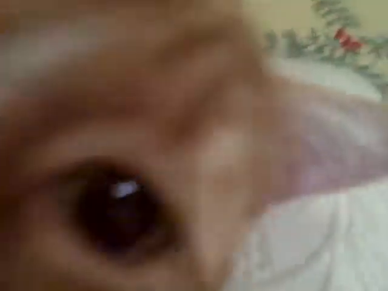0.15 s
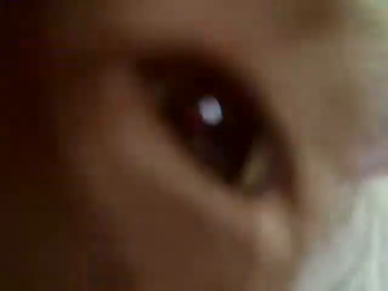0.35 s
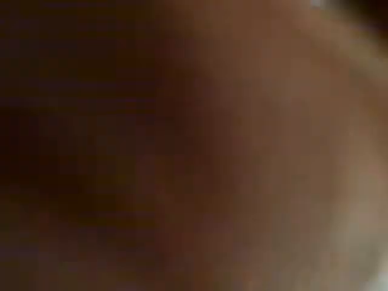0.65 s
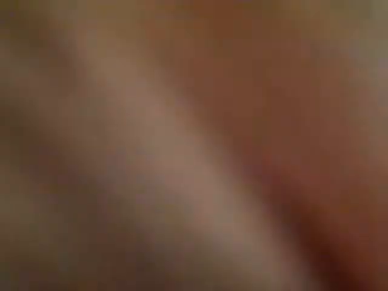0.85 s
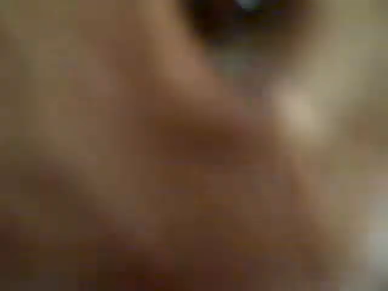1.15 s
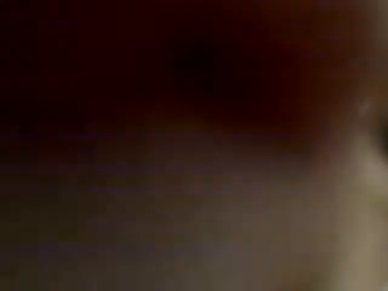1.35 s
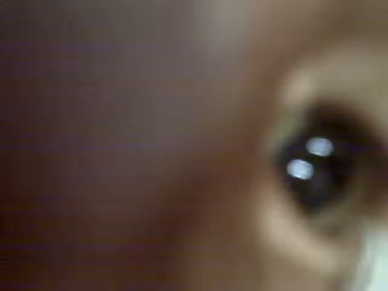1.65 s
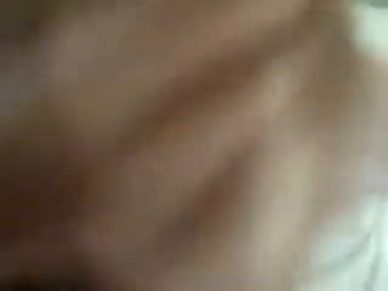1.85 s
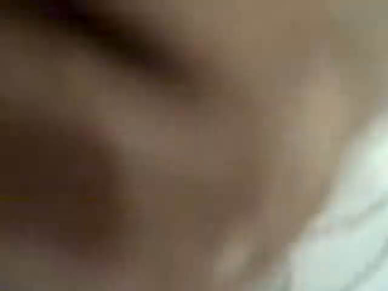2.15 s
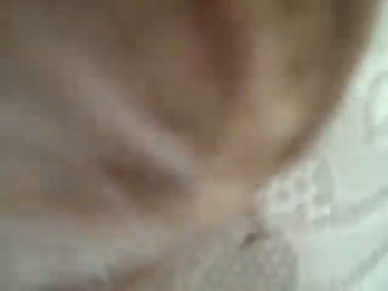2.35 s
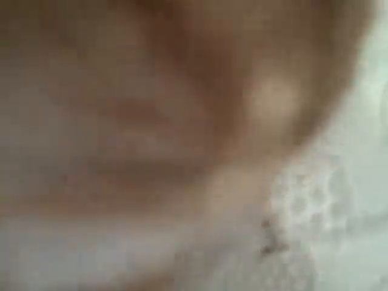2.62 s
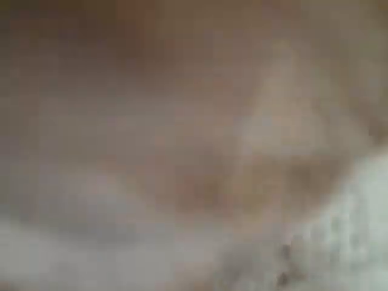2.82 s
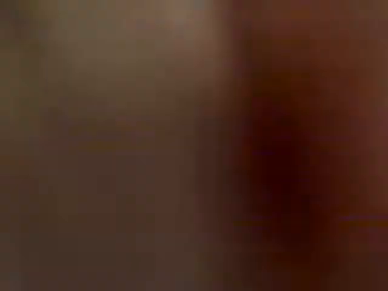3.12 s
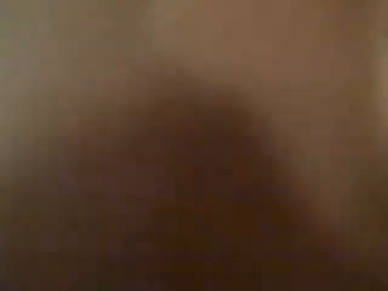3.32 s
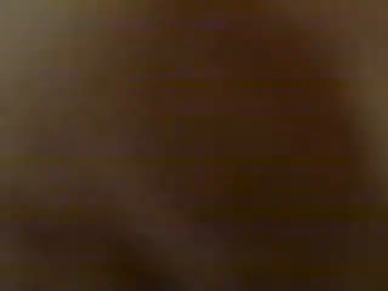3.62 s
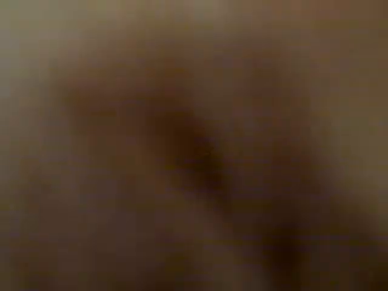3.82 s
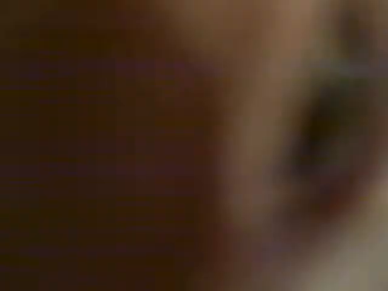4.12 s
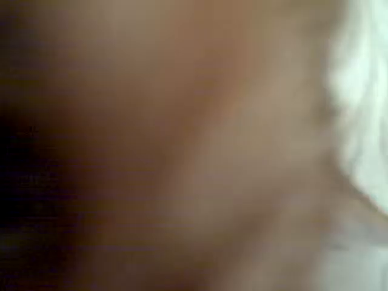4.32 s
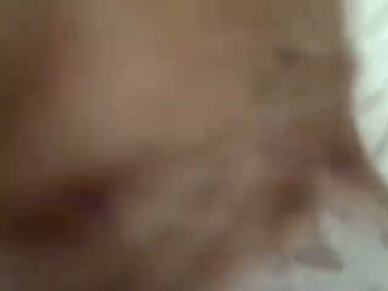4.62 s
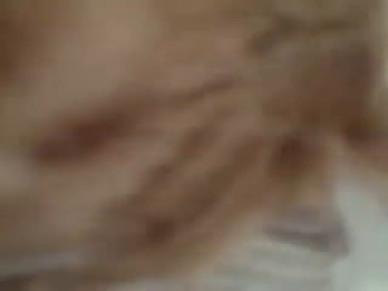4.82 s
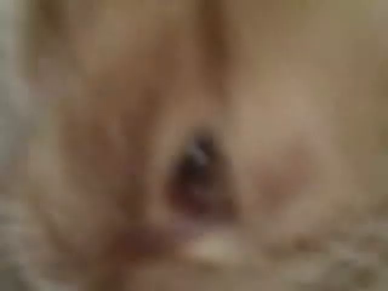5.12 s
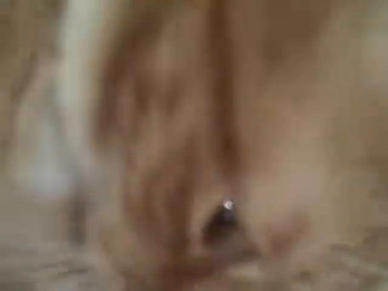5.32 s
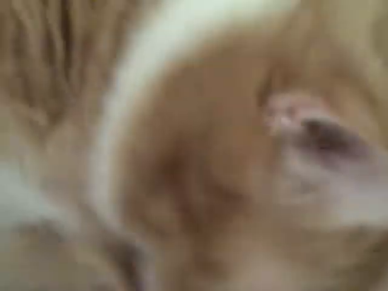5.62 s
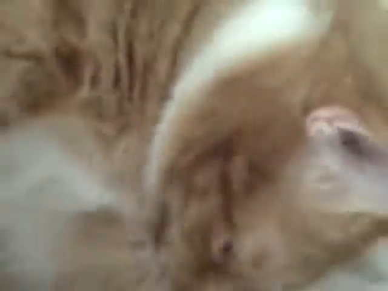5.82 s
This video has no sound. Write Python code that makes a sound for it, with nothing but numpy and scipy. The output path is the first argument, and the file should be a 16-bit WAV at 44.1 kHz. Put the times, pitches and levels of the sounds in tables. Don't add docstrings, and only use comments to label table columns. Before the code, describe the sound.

Extremely close, low-quality microphone indoors: quick nasal sniffs chopped by a rough purr of about 28 pulses a second, low wind bumps and bright clicks. The loudest blast comes in the second second, a second long exhale follows past three seconds, then a dull gust. The end is quieter, with faint nose rattles, breathy hiss, and fur and whiskers ticking and brushing on the case over low hum.

```python
import sys
import numpy as np
from scipy import signal
from scipy.fft import rfft, irfft, next_fast_len
from scipy.io import wavfile
from scipy.ndimage import uniform_filter1d, map_coordinates

SR = 44100
rng = np.random.default_rng(int(sys.argv[2]) if len(sys.argv) > 2 else 0)


def generate_wav(signal):
    frames = np.transpose(np.atleast_2d(signal))
    scaled = np.clip(frames, -1, 1) * 32767
    pcm = np.round(scaled).astype(np.int16)
    wavfile.write(sys.argv[1], SR, pcm)


def elevation(decibels):
    levels = np.asarray(decibels, float)
    return 10 ** (levels / 20)


N = 262836
T = np.arange(N) / SR


def unit(x):
    return x / np.sqrt(np.mean(x ** 2) + 1e-20)


def wobble(rate, size=N):
    knots = rng.standard_normal(int(size * rate / SR) + 4)
    return map_coordinates(knots, [T[:size] * rate])


def filtered(x, response):
    m = next_fast_len(N + SR // 2)
    return irfft(rfft(x, m) * response(np.fft.rfftfreq(m, 1 / SR)), m)[:N]


def shape(points):
    hz, db = np.transpose(points)
    return lambda f: elevation(np.interp(np.log(f + 1), np.log(hz + 1), db))


def modes(rows):
    def response(f):
        total = 0
        for k, (hz, width, db) in enumerate(rows):
            total = total + (-1) ** k * elevation(db) * 1j * f * width / (hz * hz - f * f + 1j * f * width)
        return total
    return response


def noise(response, patchy_db):
    z = signal.stft(rng.standard_normal(N), nperseg=256)[2]
    field = uniform_filter1d(rng.standard_normal(z.shape), 4, 0)
    field = uniform_filter1d(field, 6, 1)
    patchy = signal.istft(z * elevation(patchy_db * unit(field)), nperseg=256)[1][:N]
    return unit(filtered(patchy, response))


def span(start, end, edge=.003):
    at = slice(round(start * SR), round(end * SR))
    return at, np.clip(np.minimum(T[at] - start, end - T[at]) / edge, 0, 1)


def swells(rows):
    s, db, rise, fall = np.transpose(rows)[:4, :, None]
    t = T[::32]
    return elevation(db - 10 * np.maximum((s - t) / np.abs(rise), (t - s) / np.abs(fall)))


def bursts(rows):
    start, end, first_db, last_db = np.transpose(rows)[:4, :, None]
    t = T[::32]
    fade = np.clip(np.minimum(t - start, end - t) / 0.009, 0, 1)
    progress = np.clip((t - start) / (end - start), 0, 1)
    return fade * elevation(first_db + (last_db - first_db) * progress)


def summed(gains, rest_db, extra_db=0):
    power = np.sum((gains * elevation(np.reshape(extra_db, (-1, 1)))) ** 2, axis=0) + elevation(2 * rest_db)
    return np.interp(T, T[::32], np.sqrt(power))


def rings(rows, t60, rise, rough):
    out, t = np.zeros(N + SR), np.arange(2600) / SR
    fade = (1 - np.exp(-t / rise)) * elevation(-60 * t / t60)
    fade = fade / fade.max()
    for (s, db, hz), grit in zip(rows, rng.standard_normal((len(rows), len(t)))):
        grit = unit(uniform_filter1d(grit, size=int(3 * SR / hz)))
        out[round(s * SR):][:len(t)] += elevation(db) * fade * (1 + rough * grit) * np.sin(2 * np.pi * hz * t)
    return out[:N]


# freq_hz, density_db [dB per Hz]
ROOM_COLOUR = [(53, -22), (90, -4.5), (109, -10.5), (228, -8), (698, -20), (897, -16.5), (1320, -24),
               (4210, -31), (6570, -23), (7520, -26.5), (9120, -50.5), (11900, -84.5), (20100, -120)]
# pitch_hz, level_db [rms]
HUM_PARTIALS = [(59.2, -44), (118.4, -68.5), (236.8, -67)]


def room():
    phase = 2 * np.pi * T + 0.007 * wobble(5)
    hum = 0
    for hz, db in HUM_PARTIALS:
        hum = hum + elevation(db + 2.2 * wobble(12)) * np.sqrt(2) * np.sin(hz * phase)
    air_db = -55.95 + 0.54 * wobble(4.4)
    return hum + elevation(air_db) * noise(shape(ROOM_COLOUR), patchy_db=2.0)


# time_s, level_db
FUR_LEVEL = [
    (0, -100),
    (4.4, -93),
    (4.7, -68.5),
    (5.12, -78),
    (5.45, -77.5),
    (5.96, -67),
]


def fur():
    snaps = (rng.random(N) < 120 / SR) * elevation(3 * rng.standard_normal(N))
    case = modes([(2600, 5200, -1.5), (6600, 3300, 0)])
    return elevation(np.interp(T, *np.transpose(FUR_LEVEL))) * unit(filtered(snaps, case))


# time_s, peak_db, pitch_hz
HAIR_FLICKS = [(.337, -25.5, 907), (.3095, -44, 3800), (1.0155, -44, 2200), (1.026, -46.5, 2600),
               (1.309, -27, 5590), (1.3095, -33, 1510), (4.104, -46.5, 4960), (4.738, -41, 1738),
               (4.738, -42.5, 4800), (4.802, -45, 1840), (4.9153, -38, 4393), (4.9437, -37, 3800),
               (5.0345, -36, 3000), (5.084, -35, 4170), (5.1826, -48, 3460), (5.198, -41, 4940),
               (5.38, -47, 2003), (5.401, -48, 2090), (5.442, -48, 1303), (5.4635, -45.5, 3580),
               (5.624, -41, 3880), (5.7, -44, 1198), (5.753, -43, 1302), (5.7733, -39, 5100),
               (5.81, -46, 1280), (5.854, -45, 3210), (5.914, -51, 1100), (5.917, -41, 6000),
               (5.478, -44, 6500), (5.376, -42, 6600), (4.803, -39, 7500), (5.578, -47, 2300),
               (5.679, -46, 2900), (1.168, -44, 5900), (2.822, -43, 6400), (2.612, -44, 1100)]


def hairs():
    return elevation(-2.0) * rings(HAIR_FLICKS, t60=0.00684, rise=.0002, rough=0.49)


# time_s, peak_db, pitch_hz, knock_db [re peak],
# snap_share [ratio]
CASE_TICKS = [(0.3087, -34.5, 7070, -39.5, 0.37), (0.3368, -40, 6030, -3, 0.26),
              (0.566, -13.5, 6110, -39, 0.28), (0.986, -21, 6350, -37, 0.44),
              (1.0479, -14.5, 7200, -49.5, 0.32), (2.8626, -29.5, 6400, -22.5, 0.44),
              (4.302, -24.5, 6925, -27.5, 0.36), (4.3133, -32.5, 2500, -10, 0.23),
              (4.9576, -29, 6120, -12, 0.15), (4.9928, -29, 6390, -33, 0.54),
              (5.0348, -26.5, 6440, -22, 0.4), (5.084, -31, 2380, -22, 0.2),
              (5.1981, -36.5, 5970, -30, 0.4), (5.774, -34, 6720, -26.5, 0.56),
              (5.8546, -25.5, 6200, -43, 0.34), (5.899, -34, 6360, -14.5, 0.44),
              (1.7135, -17, 3400, -38, 0.16),
              (1.0146, -42, 1900, -30, .4),
    (1.026, -40, 6700, -35, .3),
    (1.034, -36, 7000, -35, .3),
    (1.042, -34, 6800, -35, .3),
    (4.2775, -33, 1500, -1, 1.6),
]


def ticks():
    out, t = np.zeros(N + SR), np.arange(600) / SR
    contacts = CASE_TICKS
    for (s, db, hz, knock_db, share), snap in zip(contacts, rng.standard_normal((len(contacts), len(t)))):
        ring = np.sin(2 * np.pi * hz * t) * elevation(-60 * t / 0.00462) * 1.403 * (1 - np.exp(-t / 0.00018))
        crack = share * snap * elevation(-60 * t / 0.0034)
        knock = elevation(knock_db + 10.5) * (t / 0.0002) * np.exp(1 - t / 0.00019)
        out[round(s * SR):][:len(t)] += elevation(db) * (ring + crack + knock)
    return filtered(out[:N], lambda f: 1 / (1 + (f / 8100) ** 16))


# time_s, peak_db, pitch_hz
PURR_THUMPS = [(1.586, -21, 161.2), (1.683, -23, 120.5), (1.711, -24.5, 172.4), (1.744, -26.5, 194),
               (1.776, -25, 188.5), (1.815, -30.5, 210), (1.845, -31, 170), (1.881, -33.5, 188),
               (1.917, -35, 194), (2.146, -38, 121), (2.183, -40, 121.7), (2.669, -41.5, 204),
               (2.699, -39, 121), (2.737, -40, 171), (3.104, -32, 140), (3.132, -18, 156),
               (3.199, -26, 121), (3.234, -23, 120.3), (3.699, -35, 178), (4.469, -39.5, 215.3),
               (4.512, -42, 230.3), (5.025, -35.5, 203.8), (5.059, -38, 120.7), (5.095, -40.5, 120.5)]


def thumps():
    return elevation(-3) * rings(PURR_THUMPS, t60=0.059, rise=0.0021, rough=0.22)


# time_s, peak_pressure [signed, full scale 1], width_s
MEMBRANE_SHOVES = [(0.563, -0.15, 0.00313), (.837, -0.26, 0.0055), (.935, -0.165, 0.0029),
                   (1.248, 0.35, 0.00257), (1.255, -0.2, 0.0033), (1.6285, 0.28, 0.0015),
                   (1.668, -0.26, 0.00175), (1.688, -0.36, 0.0035), (2.349, -0.12, 0.0057),
                   (2.637, -0.1, 0.0017), (2.872, -0.046, 0.0012), (3.137, -0.19, 0.00096),
                   (3.149, 0.23, 0.0031), (3.184, 0.23, 0.00127), (3.193, -0.25, 0.00336),
                   (3.844, -0.159, 0.0022), (3.951, -0.134, 0.0017), (3.993, 0.15, 0.0016),
                   (3.998, -0.088, 0.0029),
                   (1.624, 0.322, 0.000545), (1.6287, 0.32, 0.00047), (1.636, 0.243, 0.0013),
             (1.6522, 0.315, 0.00038), (1.6532, -0.145, 0.00039), (1.6583, 0.22, 0.0005),
             (1.6643, 0.28, 0.00022), (1.6669, -0.34, 0.000424), (1.6702, -0.34, 0.000283),
             (1.675, 0.292, 0.00082), (1.605, 0.21, 0.0045), (1.712, 0.12, 0.0029), (1.721, -0.23, .003),
             (1.728, .15, 0.0031), (3.116, 0.11, .004), (3.2, .1, .002), (.656, 0.096, 0.0012),
             (.672, 0.17, 0.0015), (.679, -0.15, 0.0011), (1.27, -0.166, 0.00198), (3.963, -0.095, 0.0013),
             (3.988, -0.11, .0012)]
# start_s, end_s, level_db, brightness_hz
TORN_JET = [
    (0.65, 0.681, -25, 695),
    (0.831, 0.847, -31, 280),
    (0.86, 0.924, -37, 352),
    (0.932, 0.941, -25.5, 395),
    (1.257, 1.318, -33.5, 423),
    (1.583, 1.594, -25, 500),
    (1.617, 1.645, -22, 2390),
    (1.645, 1.663, -20.5, 1900),
    (1.659, 1.678, -20.5, 1700),
    (3.931, 4.003, -35, 197),
]


def gusts():
    out = np.zeros(N)
    for s, peak, width in MEMBRANE_SHOVES:
        out += peak * np.exp(-.5 * ((T - s) / width) ** 2)
    for start, end, db, top_hz in TORN_JET:
        at, fade = span(start, end)
        b, a = signal.butter(N=1, Wn=[0.176 * top_hz, top_hz], btype="band", fs=SR)
        eddies = signal.lfilter(b, a, np.cumsum(rng.standard_normal(SR // 4)))
        eddies = eddies * elevation(3.6 * wobble(300, size=SR // 4))
        out[at] += elevation(db) * fade * unit(eddies[-len(fade):])
    return out


# peak_s, level_db, rise_s [per 10 dB], fall_s [per 10 dB]
PRESSURE_SWELLS = [(.05, -38, -1, 1.12), (.565, -33, 0, 0), (.858, -23, 0.11, 0.1), (1.2, -34, 0.5, -0.55),
                   (1.618, -16, 0.03, 0.034), (1.73, -20.5, 0.06, 0.09), (2.2, -38, 0.82, 0.5),
                   (2.32, -33.5, 0.5, 0.2), (2.786, -27.5, 0.34, 0), (3.135, -22, 0.15, 0),
                   (3.438, -40, 0.15, -0.2), (3.55, -34, -0.9, 0.4), (3.905, -28.5, 0, 0.2),
                   (5.226, -38, 0.4, 0.42)]
# freq_hz, density_db [dB per Hz]
PUSH_COLOUR = [(8, -20.5), (20, 12), (35, -2), (50, 2), (75, -25.5), (200, -71.5)]
# peak_s, churn_db, rise_s [per 10 dB], fall_s [per 10 dB], throat_db [re churn]
AIR_GUSTS = [(.48, -39, 0.2, 0.2, -9), (.672, -24, 0.025, 0.012, -11.5), (.858, -31, 0.06, 0.04, -18),
             (1.255, -23, -0.03, 0.01, -19.5), (1.33, -42.5, 0.12, 0.15, -5.5),
             (1.591, -27, -0.03, 0.1525, -11), (1.66, -25, 0.0352, 0.0415, -7),
             (1.732, -24, 0.021, 0.05, -13), (1.85, -37, 0.16, 0.05, -15.5), (2.335, -42, 0.1, 0.12, -10),
             (2.652, -42.5, 0.2, 0.04, -11.5), (2.786, -42.5, 0.2, 0.03, -15.5),
             (2.869, -52.5, 0.2, -1, -15.5), (3.133, -23.5, 0.0137, 0.086, -16),
             (3.32, -43, 0.18, 0.43, -3), (3.54, -34, 0.23, 0.1178, -2),
             (3.69, -36.5, 0.2253, 0.0226, -6.5), (3.839, -32.5, 0.03, 0.08, -33.5),
             (3.984, -27.5, 0.05, 0.03, -18), (4.669, -43.5, 1.2, 0.03, -10), (4.84, -39, 0.1, 0.04, -14),
             (5.06, -41, 0, 0.12, -21)]
# freq_hz, density_db [dB per Hz]
CHURN_COLOUR = [(35, -29), (65, 6), (130, -3), (250, -7.5), (500, -17.5), (1500, -51.5), (5000, -74.5)]


def puffs(gate, pulses):
    push = elevation(-3) * summed(swells(PRESSURE_SWELLS), rest_db=-46) * noise(shape(PUSH_COLOUR), patchy_db=0)
    eddies = gate ** .8 * unit(elevation(2.73 * wobble(45)) * noise(shape(CHURN_COLOUR), patchy_db=2.0))
    churn = elevation(-2.5) * summed(swells(AIR_GUSTS), rest_db=-55) * eddies
    jet = filtered(pulses * elevation(2.7 * wobble(24.945)), lambda f: 1 / (1 + 1j * f / 150) ** 2)
    return push + churn + jet


# start_s, end_s, level_db, low_hz, high_hz
NOSE_RATTLES = [(4.369, 4.379, -55, 1700, 4600), (4.439, 4.449, -49, 800, 3100),
                (4.461, 4.483, -52, 1100, 2770), (4.496, 4.521, -49.5, 1670, 3400),
                (4.532, 4.556, -50, 1700, 3400), (4.566, 4.579, -48.5, 1500, 3400),
                (4.546, 4.555, -44.5, 5700, 7200), (4.565, 4.575, -45, 5600, 7800),
                (4.451, 4.465, -51, 5600, 7800), (4.658, 4.668, -40.5, 6400, 7200),
                (3.136, 3.158, -45.5, 2600, 3700), (3.17, 3.19, -47.5, 1900, 3900),
                (3.204, 3.232, -46.5, 1700, 3600), (1.583, 1.592, -36.5, 510, 1800),
                (1.282, 1.312, -39, 210, 521), (4.38, 4.43, -59, 1800, 2800), (4.93, 5.0, -56, 1500, 3200),
                (.508, .517, -37.5, 900, 6700), (1.263, 1.272, -40, 5200, 7600),
                (4.18, 4.196, -56, 1500, 2400), (3.988, 4.075, -51, 5500, 7400),
                (3.735, 3.77, -58.5, 1200, 7500), (.522, .534, -56.5, 500, 8700),
                (2.635, 2.645, -43.5, 6200, 7800), (2.737, 2.746, -42.5, 5900, 7500),
                (4.636, 4.644, -44, 6400, 7800), (5.2, 5.3, -54.5, 3020, 5500),
                (0.14, .222, -57, 5300, 7300), (2.42, 2.512, -58, 6200, 7600),
                (1.525, 1.54, -49.5, 750, 2300), (1.698, 1.714, -42, 1500, 7200),
                (1.596, 1.62, -46, 2300, 7200), (4.37, 4.52, -55, 5800, 7400),
                (4.304, 4.318, -46, 800, 2900)]


def rattles():
    out = np.zeros(N)
    for start, end, db, low_hz, high_hz in NOSE_RATTLES:
        at, fade = span(start, end, edge=0.0025)
        b, a = signal.butter(N=2, Wn=[low_hz, high_hz], btype="band", fs=SR)
        crackle = rng.standard_normal(SR // 4) * elevation(4 * wobble(400, size=SR // 4))
        band = signal.lfilter(b, a, crackle)
        out[at] += elevation(db) * fade * unit(band[-len(fade):])
    return out


# time_s, peak_db, pitch_hz
NASAL_POPS = [(0.5092, -30, 2296), (2.0308, -55, 2250), (2.0677, -39.5, 2281), (2.1067, -50, 2390),
              (2.147, -50.5, 2340), (2.4716, -45.5, 2530), (2.5137, -40, 2240), (2.5521, -47.5, 2673),
              (2.585, -50, 2604), (2.8852, -40.5, 2286), (2.9245, -43.5, 2400), (2.9647, -44.5, 2204),
              (3.0006, -52, 2264), (4.371, -44, 2572), (4.4034, -48, 2608), (4.4428, -48, 2202),
              (4.4657, -43, 2413), (4.4754, -41.5, 1959), (4.5865, -36.5, 3106), (4.6593, -43.5, 2130)]


def pops():
    return elevation(-4.0) * rings(NASAL_POPS, t60=0.018, rise=0.0009, rough=.5)


# start_s, end_s, first_hz, last_hz, level_db
WHEEZE_GLIDES = [(0.345, 0.529, 5370, 5336, -36.5), (0.332, 0.552, 980.9, 997.8, -44),
                 (0.505, 0.513, 2254, 2280, -37), (0.575, 0.583, 3653, 3644, -41),
                 (0.765, 0.786, 2374, 2406, -49), (2.024, 2.161, 2250, 2362, -63.5),
                 (2.414, 2.629, 2208, 2820, -61), (2.858, 2.987, 2350, 2343, -66),
                 (3.408, 3.416, 2340, 2340, -43), (2.024, 2.164, 948, 950, -60),
                 (2.429, 2.587, 950, 948.6, -59), (4.348, 4.643, 2344, 3370, -61.5),
                 (4.909, 5.047, 4510, 3300, -50.5)]


def wheeze(gate):
    out = np.zeros(N)
    for start, end, first_hz, last_hz, db in WHEEZE_GLIDES:
        width_hz = 220 + .06 * first_hz + .75 * abs(last_hz - first_hz)
        at, fade = span(start, end, edge=0.24 * (end - start))
        phase = 2 * np.pi * np.cumsum(np.linspace(first_hz, last_hz, len(fade))) / SR
        a = wobble(width_hz, size=SR // 2)[:len(fade)]
        b = wobble(width_hz, size=SR // 2)[:len(fade)]
        out[at] += elevation(db) * fade * unit(a * np.cos(phase) + b * np.sin(phase))
    return gate ** 1.6 * out


# first_opening_s, last_opening_s, chop_depth [0-1], closing_s, pulse_db
PURR_TRAINS = [(0.232, 0.272, 0.2, 0.013, -31), (0.32, 0.506, 0.34, 0.00525, -42),
               (0.5705, .605, 0.72, 0.00577, -25), (0.745, .771, .6, .009, -39),
               (0.847, 0.88, 0.7, 0.0048, -25.5), (1.22, 1.339, 0.3, 0.0074, -26),
               (1.589, 1.681, 1, 0.014, -25), (1.722, 1.743, 0.05, 0.015, -25),
               (1.777, 1.95, 0.35, 0.0084, -31), (2.031, 2.141, 0.7, .005, -37),
               (2.248, 2.354, 0.83, 0.0108, -35), (2.436, 2.585, 0.1, 0.0085, -40),
               (2.63, 2.768, 0.94, 0.0083, -54), (2.88, 2.998, 0.79, 0.0034, -62),
               (3.068, 3.203, 0.49, 0.0075, -30), (3.763, 3.912, 0.38, 0.0174, -34),
               (4.131, 4.172, 0.45, 0.0123, -46), (4.295, 4.4, 0.3, 0.0074, -42),
               (4.436, 4.468, 0.7, 0.011, -35.5), (4.492, 4.531, 0.35, 0.017, -39),
               (4.58, 4.6, 0.9, 0.0044, -46), (4.633, 4.656, 0.63, .004, -45),
               (4.707, 4.726, .27, .009, -53)]


def larynx():
    rise_s, shut_s, purr_per_s = .0045, .005, 28
    gate, pulses = np.ones(N), np.zeros(N)
    for first, last, depth, fall_s, pulse_db in PURR_TRAINS:
        period = (last - first) / round((last - first) * purr_per_s)
        on = (T >= first) & (T < last + period)
        age = (T[on] - first) % period
        flow = unit((1 - np.exp(-age / rise_s)) ** 2 * np.exp(-age / fall_s))
        leak = (1 - depth) * (1 - depth * np.exp((age - period) / shut_s))
        gate[on] = unit(leak + depth * flow)
        pulses[on] = elevation(pulse_db) * (flow - flow.mean())
    return gate, pulses


# start_s, end_s, first_db, last_db [hiss], cavity_db [re hiss]
SHORT_SNIFFS = [(0.042, 0.108, -51.5, -51, -1.5), (0.221, 0.274, -43, -57, -5),
                (0.328, 0.383, -43, -29.5, -2), (0.374, 0.526, -33, -36, -3),
                (0.565, 0.647, -34, -32, -10.5), (0.626, 0.681, -31.5, -43.5, -6.5),
                (0.732, 0.793, -47, -48, 1), (0.843, 0.914, -30.5, -36, -5.5),
                (0.894, 0.939, -34, -42.5, -5), (0.96, 0.987, -43.5, -50, -1),
                (1.224, 1.276, -50, -35, -2.5), (1.26, 1.365, -43, -39.5, -2),
                (1.461, 1.514, -45, -40, -7.5), (2.247, 2.327, -52, -38.5, -4),
                (2.318, 2.372, -40, -50.5, -5.5), (2.632, 2.798, -43.5, -51, -7.5),
                (2.88, 3.023, -49, -61.5, -10.5), (3.068, 3.1, -58, -61.5, -5), (3.768, 3.806, -63, -64, 4),
                (3.803, 3.842, -44.5, -55.5, -3), (3.837, 3.996, -41.5, -45, -6.5),
                (4.299, 4.321, -55, -47, 2), (4.574, 4.614, -42, -45.5, -5.5), (4.63, 4.87, -48, -52.5, -8)]
# start_s, end_s, first_db, last_db [hiss], cavity_db [re hiss]
LONG_BREATHS = [
    (1.593, 1.664, -51.5, -37.5, 4),
    (1.655, 1.705, -35.5, -40.5, -2.5),
    (1.704, 1.827, -32, -52, 2),
    (1.825, 1.974, -48, -49.5, 1.5),
    (3.095, 3.16, -47.5, -32.5, -9.5),
    (3.157, 3.27, -33.5, -45, -7),
    (3.258, 3.422, -44, -38.5, -11),
    (3.407, 3.701, -38, -41, -11),
    (3.688, 3.742, -39.5, -49.5, -16.5),
]
# peak_s, hiss_db, rise_s [per 10 dB], fall_s [per 10 dB], cavity_db [re hiss]
SOFT_BREATHS = [(.12, -56, -0.2, 0.1, -5), (1.063, -65, -1.24, 0.4, -8.5), (1.532, -68, 0.4, -2, 6.5),
                (2.08, -58, 0.09, 0.14, -1), (2.519, -48.5, -0.07, 0.116, -4.5),
                (2.85, -54.5, -0.1, 0.05, -12.5), (4.011, -45, 0, 0.06, -10), (4.19, -65.5, 0.36, 0.18, 6),
                (4.285, -60, 0.3, 3, -10), (4.47, -52, 0.028, 0, -5), (4.87, -55, 0.7, 0, -21.5),
                (5.02, -46, 0.12, 0.07, -6.5), (5.1, -51.5, 0.35, -0.04, -10),
                (5.216, -48, -0.03, 0.15, -12), (5.285, -47.5, 0, 0.06, -7.5), (5.55, -52, 0, 0.3, -15),
                (5.635, -61.5, 0, 0.1, 5.5), (5.755, -48.5, 0.0336, -0.03, -11), (5.94, -55, 0.3, 10, -11)]
# freq_hz, density_db [dB per Hz]
NOSTRIL_COLOUR = [(2470, -26), (4200, -11), (4530, -11), (4840, -7), (5070, -11.5), (5360, -2.5), (6680, 2),
                  (7700, -8.5), (8630, -20.5), (9120, -34), (11900, -79.5), (20100, -120)]
# freq_hz, width_hz, level_db
CAVITY_MODES = [(2004, 770, -2.5), (3260, 520, -1), (3860, 330, -9)]
# freq_hz, width_hz, level_db
THROAT_MODES = [(590, 900, 6), (935, 700, 7)]


def nose(gate):
    breaths = np.vstack([bursts(SHORT_SNIFFS + LONG_BREATHS), swells(SOFT_BREATHS)])
    cavity_db = [row[4] for row in SHORT_SNIFFS + LONG_BREATHS + SOFT_BREATHS]
    flow = summed(breaths, rest_db=-77)
    ring = summed(breaths, -84.5, cavity_db)
    rush = summed(swells(AIR_GUSTS), -89.5, [row[4] for row in AIR_GUSTS])
    rush = rush * np.minimum(flow / elevation(-54.5), 1)
    flutter = elevation(1.17 * wobble(60))
    hiss = flow * noise(shape(NOSTRIL_COLOUR), patchy_db=1.5)
    cavity = elevation(-2.0) * ring * noise(modes(CAVITY_MODES), patchy_db=2.5)
    throat_noise = noise(lambda f: modes(THROAT_MODES)(f) * f / (f + 300), patchy_db=1.0)
    throat = elevation(-2.5) * np.hypot(elevation(-11) * flow, rush) * throat_noise
    return flutter * (gate * hiss + gate ** 0.64 * cavity + gate ** 0.4 * throat)


def scene():
    gate, pulses = larynx()
    contacts = fur() + hairs() + ticks()
    wind = thumps() + gusts() + puffs(gate, pulses)
    breath = rattles() + pops() + wheeze(gate) + nose(gate)
    return (room() + contacts + wind + breath)[None]


def top_cut(x):
    return signal.sosfilt(signal.butter(12, 9270, fs=SR, output="sos"), x)


def record(dry):
    def band(f):
        return 1j * f / (14 + 1j * f) / (1 + (f / 8700) ** 30) * (f < 9250)
    squeezed = dry[0] / (1 + np.abs(dry[0] / .62) ** 4) ** .25
    return top_cut(filtered(squeezed, band)[None])


dry = scene()
out = record(dry)
generate_wav(out)
```